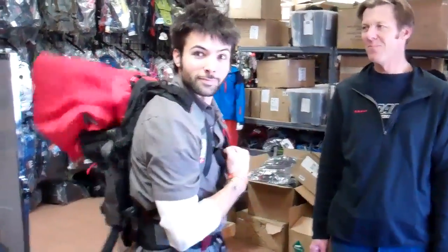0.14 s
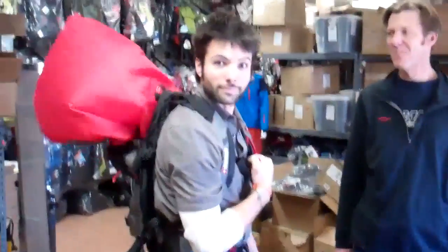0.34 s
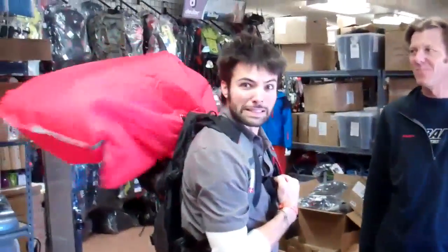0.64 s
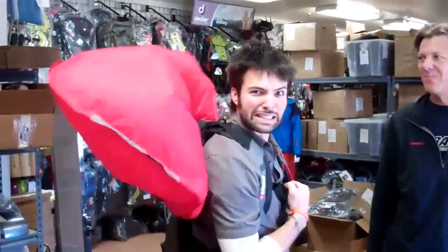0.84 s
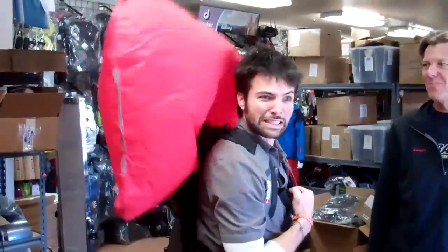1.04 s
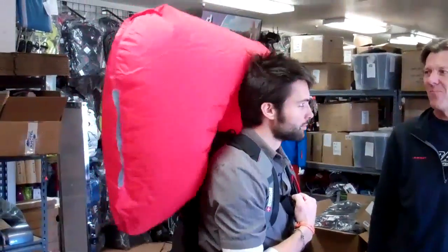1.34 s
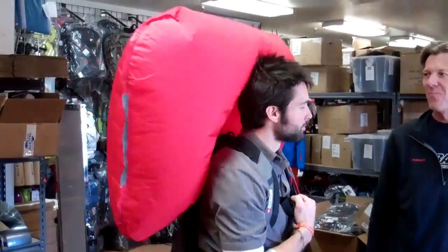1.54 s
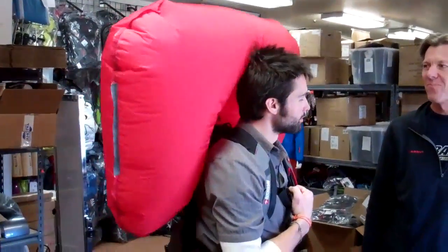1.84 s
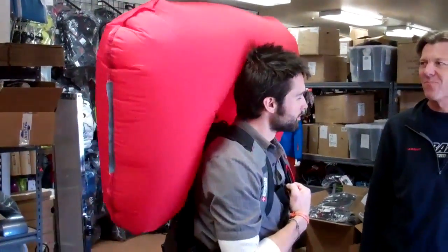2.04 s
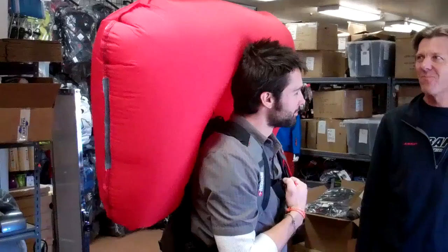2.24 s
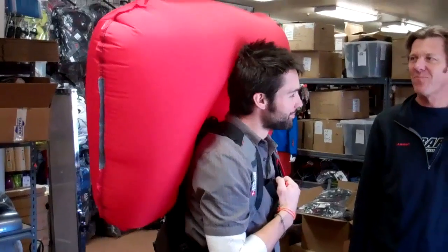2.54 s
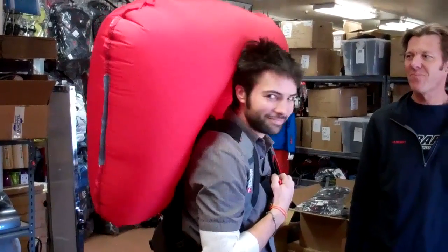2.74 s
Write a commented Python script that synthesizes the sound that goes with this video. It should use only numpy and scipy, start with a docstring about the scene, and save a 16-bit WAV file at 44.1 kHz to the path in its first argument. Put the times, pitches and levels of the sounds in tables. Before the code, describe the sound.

A sudden rush of escaping gas inflates a fabric bag: tiny tug and snap first, then cracking cloth and full roar, easing into thinner, sizzling hiss; close stereo microphone in a small indoor storeroom, leaning left.

```python
"""Gas escapes from a cartridge and inflates a fabric airbag in a small shop: the jet hisses on while
the roar of air drawn into the bag dies away as the pressure falls. Before that the handle is tugged
and the pack pops open, and the bag unfolds with a whump. Gas, rustle, cracks and room are shaped noise,
snaps and thuds are short sine waves, whistles are wavering tones, and echoes off a nearby surface
colour the hiss and roar."""
import sys
import numpy as np
from scipy import signal
from scipy.io import wavfile
from scipy.ndimage import uniform_filter1d

SR = 44100
rng = np.random.default_rng(int(sys.argv[2]) if len(sys.argv) > 2 else 0)


def put_to_file(sound):
    """Save the sound as 16-bit audio at rate SR, in the file named by the first command-line argument."""
    columns = np.atleast_2d(sound).T  # one column per channel
    safe = np.clip(columns, -1, 1)
    whole_steps = np.round(safe * 32767)
    wavfile.write(sys.argv[1], SR, whole_steps.astype(np.int16))


N = 127890
T = np.arange(N) / SR  # time in seconds

# How loud each steady sound is over time. Each row: time in seconds, level in dB.
BASS_LEVEL = [(0, -65), (.1, -63), (.22, -65), (.3, -62.5), (.8, -64), (1.7, -69.5), (2.4, -73),
              (2.6, -66.5), (2.9, -70.5)]  # bass rumble
RUSH_LEVEL = [(.116, -32.5), (.13, -35), (.16, -37.5), (.2, -32.5), (.24, -41), (.32, -44), (.58, -44),
              (.75, -45), (1.2, -46), (1.66, -49), (2.1, -55), (2.6, -52), (2.67, -56), (2.9, -58)]  # low rush in the unfolding fabric
JET_LEVEL = [(.116, -36), (.13, -34), (.15, -34.5), (.34, -38.5), (.6, -34.5), (.75, -36.5), (1.2, -38),
             (1.7, -39.5), (2.1, -40), (2.55, -38.5), (2.9, -41.5)]  # hiss of the nozzle jet
FIZZ_LEVEL = [(.116, -36.5), (.16, -36), (.2, -39), (.34, -41.5), (.6, -37), (.72, -37.5), (.78, -40),
              (1.24, -38.5), (1.7, -38.5), (2.1, -40.5), (2.5, -38.5), (2.9, -39.5)]  # highest band of the escaping gas
# Air roaring into the bag. Each row: time in seconds, lower band level in dB, upper band level in dB.
ROAR_LEVELS = [(.116, -31.5, -32.5), (.14, -39.5, -37), (.17, -36.5, -37.5), (.19, -37.5, -34.5),
               (.23, -35.5, -35.5), (.34, -37, -36), (.41, -37, -36), (.58, -37.5, -34.5),
               (0.721, -40.5, -38), (1.24, -42, -39.5), (1.66, -44, -41), (2.1, -46.5, -43.5),
               (2.6, -48, -47.5), (2.68, -52, -48), (2.9, -53.5, -48)]

# Tone colour of each noise. Each row: frequency in Hz, relative strength in dB per Hz.
ROOM_TONE = [(250, -5), (500, -5.5), (1000, -6), (1600, -10), (3000, -10), (8500, -17.5), (11000, -26)]  # room noise
BASS_TONE = [(20, -14), (32, -11), (97, -13.5), (154, -6.5), (280, -3), (300, -1.5), (390, -43),
             (660, -120)]  # bass rumble
TUG_TONE = [(180, -48), (300, -18), (481, -6), (546, -9), (692, -3.5), (949, -5), (1160, -2.5),
            (9190, -26.5), (13000, -51)]  # strap rustle
CRACK_TONE = [(800, 1), (2000, -6), (4500, 8), (6500, -3), (9000, -17), (12000, -22)]  # fabric cracks
RUSH_TONE = [(160, -48), (280, -24), (350, -5.5), (443, -5.5), (617, -6), (776, -2.5), (875, -6),
             (1020, -4), (1100, -4), (1430, -12), (2420, -120)]  # low rush
ROAR_LOW_TONE = [(590, -25), (1000, -7), (1130, -5), (1270, -5), (1510, -4), (2000, -5.5), (2600, -23),
                 (4400, -120)]  # lower band of the roar
ROAR_TOP_TONE = [(1180, -44), (2000, -3.5), (2380, -0.5), (2640, 0), (2900, -1), (3500, -4), (4550, -5),
                 (7700, -120)]  # upper band of the roar
JET_TONE = [(3300, -1), (3750, -0.5), (4200, 0), (4800, 3), (5600, 0.5), (6700, -4.5)]  # nozzle jet
FIZZ_TONE = [(6400, -6.5), (7500, -2.5), (8700, -2), (9500, -5), (10500, -9), (12000, -17), (14000, -30.5)]  # fizz

# Short bursts of noise in the fabric. Each row: start in seconds, level in dB,
# time to fall by 60 dB in seconds.
CRACKS = [(.0695, -50, .03), (0.1137, -28, 0.023), (.123, -31, 0.025), (0.129, -23.5, 0.033),
          (0.159, -27, 0.016), (0.183, -24, 0.027)]
# Low thuds of the pack body. Each row: start in seconds, starting level in dB,
# time to fall by 60 dB in seconds, pitch in Hz.
THUDS = [(0.026, -55, .2, 55), (0.1148, -31.5, 0.071, 168), (0.081, -48, 0.058, 45), (0.12, -43, 0.064, 54),
         (.156, -41, 0.089, 151), (.188, -48, .1, 149)]
# Knocks and snaps of the pack. Each row: start in seconds, level in dB, pitch in Hz, number of cycles.
SNAPS = [(0.058, -30, 1220, 1.9), (.058, -45, 3280, 30), (0.1144, -15, 950, 1.8), (0.117, -21.5, 2070, 2.9),
         (0.1191, -20, 2450, 2.2), (.1595, -15, 5000, 1.7)]
# Breathy whistles of the flow in the folds. Each row: start in seconds, length in seconds,
# pitch in Hz, spread setting in Hz, level in dB.
WHISTLES = [(.17, .06, 950, 350, -32.5), (0.169, 0.065, 370, 110, -46), (0.346, 0.099, 1548, 170, -36.5),
            (0.465, 0.22, 2550, 200, -38), (0.746, 0.99, 2358, 250, -44.5),
            (1.186, 0.041, 8830, 300, -38.5), (1.201, 0.56, 1328, 200, -51), (1.76, 0.44, 2277, 120, -45),
            (2.32, 0.31, 777, 60.4, -52), (2.379, 0.23, 952, 60, -51), (2.778, 0.28, 1164, 50, -47.5),
            (2.74, 0.3, 2026, 70, -51)]
# Echoes off a nearby surface. Each row: time in seconds, echo share (0 to 1) for lower roar and rush,
# echo share (0 to 1) for jet and upper roar, spacing of the peaks in Hz.
REFLECTION = [(1.3, 0.05, 0.17, 730), (1.9, 0.17, 0.24, 740), (2.3, 0.42, 0.4, 740), (2.58, 0.4, 0.44, 740),
              (2.66, 0.16, 0.53, 708)]

# How alike left and right are. Each row: frequency in Hz, likeness (0 to 1).
LIKENESS = [(60, 0.47), (250, 0.64), (600, 0.81), (1200, 0.71), (2800, 0.5), (5000, 0.45), (9000, 0.3),
            (12000, .45)]
# How far the sound leans left. Each row: frequency in Hz, left minus right in dB.
LEAN = [(40, 6), (150, 12), (350, 5), (700, 3), (1400, 2.5), (2800, 3.5), (5000, 4), (7500, 9),
        (9500, 11.5), (11500, -1.5)]
# How far left runs ahead of right. Each row: frequency in Hz, lead in radians.
LEAD = [(1200, 0), (3500, .3), (4800, .4), (6800, 1), (8400, -.2), (10500, -1.8), (12000, -.2)]

ONSET_S, JET_RISE_S, ROAR_RISE_S = 0.1142, 0.004, 0.0012  # the valve opens; seconds to fade in
# The recorder's automatic gain turns the room down when the loud hiss starts, imitated by a fixed step.
ROOM_DB, ROOM_DUCK_DB = -58, -4.5
TUG_S, TUG_DB, TUG_T60_S = 0.0572, -39.5, 0.53  # strap rustle: start, level, time to fall by 60 dB
TUG_GRAIN_DB = 4  # unevenness of the rustle, smoothed over 2 ms
SNAP_LEAN_DB = 3  # left minus right for snaps and thuds
WHISTLE_EVENING = 0.15  # 0 leaves the wavering as it is, 1 nearly removes the changes in strength
REFLECTION_TOP_HZ = 3960  # the echoes fade out around here
EDGE_HZ = 14150  # upper limit of the sound's bandwidth, where the low-pass filter cuts


def amp(db):
    """Turns dB into a plain multiplier."""
    return 10 ** (np.asarray(db) / 20)


def evened(x):
    """Scales a signal to an average (rms) strength of 1."""
    return x / np.sqrt(np.mean(x ** 2) + 1e-20)


def read(points, hz):
    """Reads a table between its rows on a log frequency axis."""
    f, value = np.transpose(points)
    return np.interp(np.log(hz + 1), np.log(f + 1), value)


def band(tone, skirt_db=36):
    """Makes a tone colour that falls by skirt_db per octave beyond its table's ends."""
    lo, hi = tone[0][0], tone[-1][0]

    def shape_db(hz):
        beyond = np.maximum(lo / (hz + 1), np.maximum(hz / hi, 1))
        return read(tone, hz) - skirt_db * np.log2(beyond)

    return shape_db


def noise(shape_db, patchy_db, ripple_db, gust_db):
    """Stereo noise with broad patches, narrow slowly shifting room ripples and shared gusts."""
    frames, hz = N // 512 + 5, np.fft.rfftfreq(2048, 1 / SR)
    a, b, c, d, p, q = rng.standard_normal((frames, 1025, 6)).T
    # Smooth across frequency (axis 0), then across time (axis 1).
    patches = evened(uniform_filter1d(uniform_filter1d(p, size=24, axis=0), size=6, axis=1))
    ripples = evened(uniform_filter1d(uniform_filter1d(q, size=2, axis=0), size=14, axis=1))
    gusts = evened(uniform_filter1d(rng.standard_normal(frames), size=2))
    # Right is part left, part fresh noise, and runs a little behind or ahead.
    same = np.clip(read(LIKENESS, hz), 0, 1)[:, None]
    lean = read(LEAN, hz)[:, None]
    delay = np.exp(-1j * read(LEAD, hz))[:, None]
    left = a + 1j * b
    right = (same * left + np.sqrt(1 - same ** 2) * (c + 1j * d)) * delay
    spectrum = np.array([left * amp(lean / 2), right * amp(-lean / 2)])
    unevenness_db = patchy_db * patches + ripple_db * ripples + gust_db * gusts
    spectrum *= amp(shape_db(hz)[:, None] + unevenness_db)
    x = signal.istft(spectrum, nperseg=2048, noverlap=1536)[1][:, :N]
    return x / np.sqrt(np.mean(x.mean(0) ** 2))


def level(curve, rise_s):
    """Silent until the valve opens, then fades in and follows the curve."""
    s, db = np.transpose(curve)
    return amp(np.interp(T, s, db)) * np.clip((T - ONSET_S) / rise_s, 0, 1)


def dying(start, db, t60):
    """A quick 1.4 ms start, then a steady fall of 60 dB in every t60 seconds."""
    fall = amp(db - 60 * np.maximum(T - start, 0) / t60)
    return fall * np.clip((T - start) / 0.0014, 0, 1)


def room():
    """Steady room noise, turned down by a fixed step at the start of the hiss."""
    return amp(ROOM_DB + ROOM_DUCK_DB * (T > ONSET_S)) * noise(band(ROOM_TONE), 0.95, 0.55, 0.5)


def bass():
    """Low noise that rumbles with a slowly changing level."""
    return amp(np.interp(T, *np.transpose(BASS_LEVEL))) * noise(band(BASS_TONE), 0.43, 0, 0.38)


def tug():
    """The strap rustles after the tug: grainy noise that dies away."""
    bumps = evened(uniform_filter1d(rng.standard_normal(N), size=88))
    grain = evened(amp(TUG_GRAIN_DB * bumps))
    return dying(TUG_S, TUG_DB, TUG_T60_S) * grain * noise(band(TUG_TONE), 0.74, 0.84, 1.6)


def cracks():
    """The fabric cracks in short bursts of noise."""
    return sum(dying(*row) for row in CRACKS) * noise(band(CRACK_TONE), 1.7, 0, 0)


def thuds():
    """The pack body thuds: low sine waves that die away."""
    return sum(dying(s, db, t60) * np.sin(2 * np.pi * hz * (T - s)) for s, db, t60, hz in THUDS)


def snaps():
    """The pack knocks and snaps: a few sine cycles that swell and stop."""
    out = np.zeros(N)
    for s, db, hz, cycles in SNAPS:
        u = np.clip((T - s) * hz / cycles, 0, 1)  # runs from 0 to 1 during the snap
        out += amp(db) * np.sin(np.pi * u) * np.sin(2 * np.pi * cycles * u)
    return out


def pack():
    """Thuds and snaps of the pack together, leaning to the left."""
    return (thuds() + snaps()) * amp([[SNAP_LEAN_DB / 2], [-SNAP_LEAN_DB / 2]])


def whistles():
    """Flow in the folds whistles: slow noise makes each tone waver as it swells and fades."""
    out = np.zeros((2, N))
    for start, length, pitch_hz, spread_hz, db in WHISTLES:
        span = (T > start) & (T < start + length)
        t = T[span]
        r = np.exp(-np.pi * spread_hz / SR)
        smoother = np.convolve([1, -r], [1, -r])
        a, b, c, d = signal.lfilter([1], smoother, rng.standard_normal((4, SR)))[:, -len(t):]
        left = a + 1j * b
        waver = np.array([left, 1.06 * left + 0.42 * (c + 1j * d)])
        waver = waver / np.sqrt(np.mean(abs(waver) ** 2))
        waver = waver / np.maximum(abs(waver), 0.05) ** WHISTLE_EVENING
        swell = np.sin(np.pi * (t - start) / length).clip(0) ** 0.33
        lean = read(LEAN, pitch_hz) / 2
        tone = (waver * np.exp(2j * np.pi * pitch_hz * t)).real
        out[:, span] += amp([[db + lean], [db - lean]]) * swell * tone
    return out


def reflection(x, column):
    """Evenly spaced echoes off a nearby surface give evenly spaced peaks; treble passes unchanged."""
    s, share, spacing_hz = np.transpose(REFLECTION)[[0, column, -1]]
    share = np.clip(np.interp(T, s, share), 0, 0.8)
    lag = SR / np.interp(T, s, spacing_hz)  # time between echoes in samples
    at = np.arange(N)
    dull = signal.sosfiltfilt(signal.butter(N=4, Wn=REFLECTION_TOP_HZ, fs=SR, output="sos"), x)
    echoed = np.zeros_like(x)
    for k in range(4):  # the direct sound and three echoes
        earlier = np.maximum(at - np.round(k * lag).astype(int), 0)
        echoed += share ** k * dull[:, earlier]
    return x - dull + np.sqrt(1 - share ** 2) * echoed


def rush():
    """Low noise of gas rushing in the unfolding fabric."""
    return level(RUSH_LEVEL, ROAR_RISE_S) * noise(band(RUSH_TONE), 0.84, 2.74, 0.38)


def roar():
    """Air drawn into the bag roars in a lower and an upper band of noise."""
    table = np.array(ROAR_LEVELS)
    lower = level(table[:, [0, 1]], ROAR_RISE_S) * noise(band(ROAR_LOW_TONE), 1.0, 3.2, 0.69)
    upper = level(table[:, [0, 2]], ROAR_RISE_S) * noise(band(ROAR_TOP_TONE), 1.0, 3.4, 0.68)
    return lower, upper


def fizz():
    """The highest noise band of the escaping gas."""
    return level(FIZZ_LEVEL, JET_RISE_S) * noise(band(FIZZ_TONE), 1.35, 2.7, 0.36)


def jet():
    """The nozzle jet hisses: a bright band of noise."""
    return level(JET_LEVEL, JET_RISE_S) * noise(band(JET_TONE), 0.89, 2.9, 0.48)


def flow():
    """All the escaping gas, with echoes on every band but the fizz."""
    lower_roar, upper_roar = roar()
    return fizz() + reflection(lower_roar + rush(), column=1) + reflection(jet() + upper_roar, column=2)


def scene():
    """Adds up the layers, from the room to the escaping gas."""
    return room() + bass() + tug() + cracks() + pack() + whistles() + flow()


def record(dry):
    """A steep filter removes what lies above the band edge."""
    low_pass = signal.firwin(1023, EDGE_HZ, window=("kaiser", 10), fs=SR)
    return signal.oaconvolve(dry, low_pass[None], "same")


dry = scene()
out = record(dry)
put_to_file(out)
```